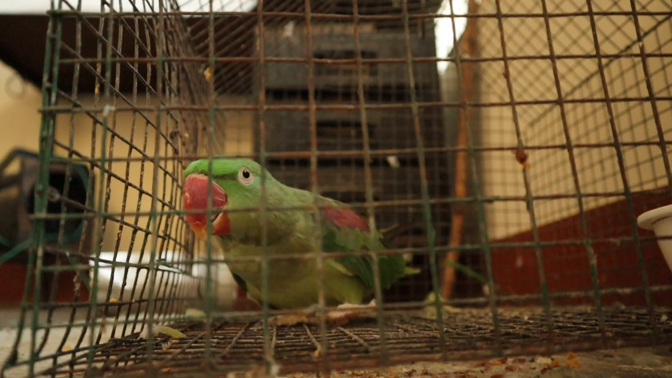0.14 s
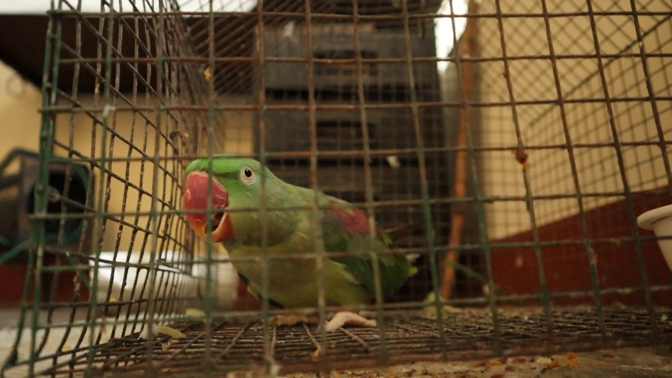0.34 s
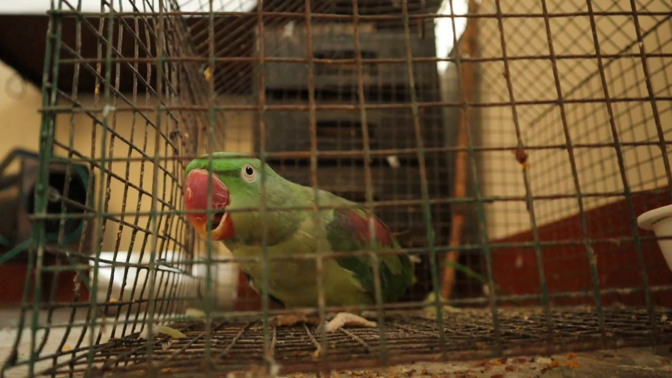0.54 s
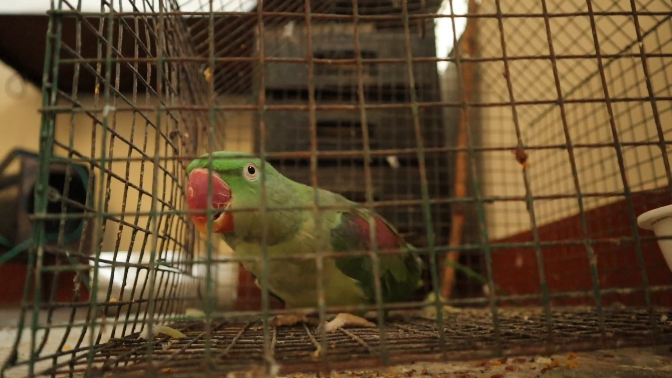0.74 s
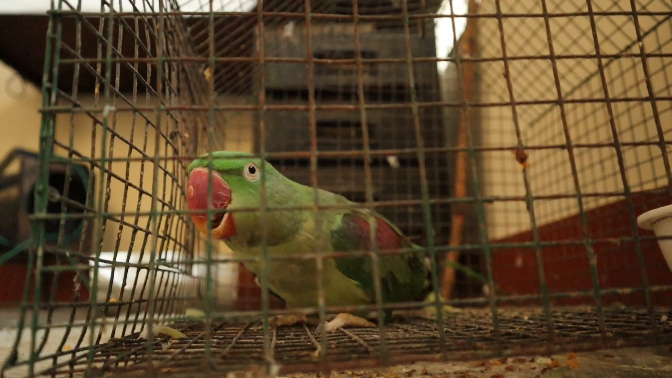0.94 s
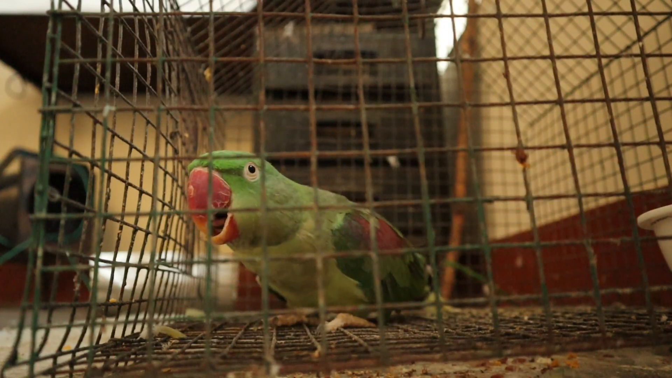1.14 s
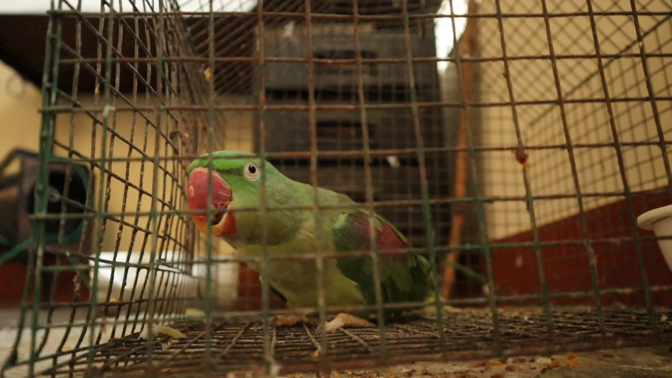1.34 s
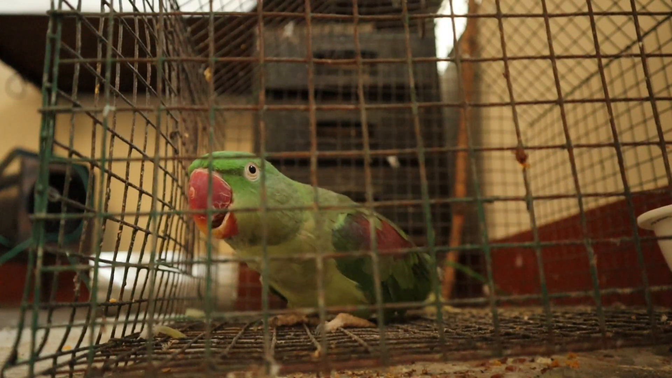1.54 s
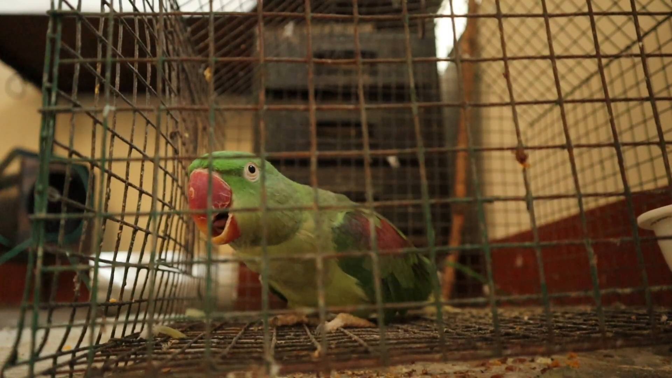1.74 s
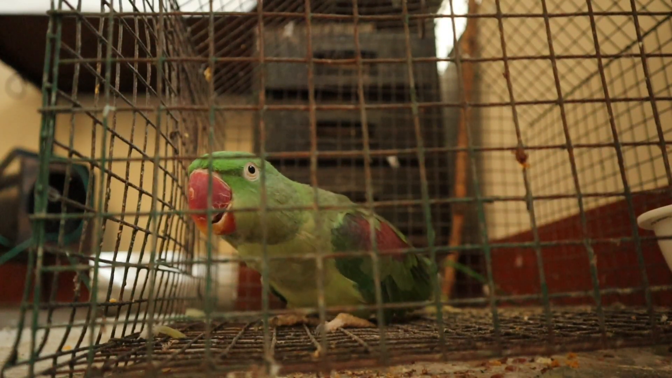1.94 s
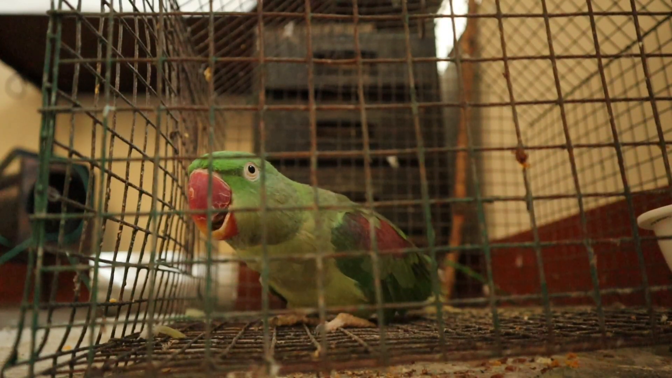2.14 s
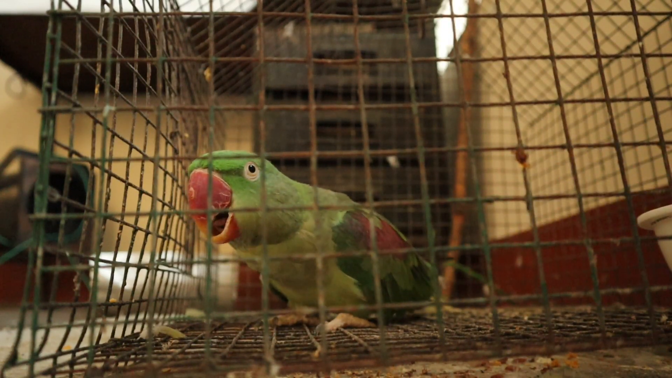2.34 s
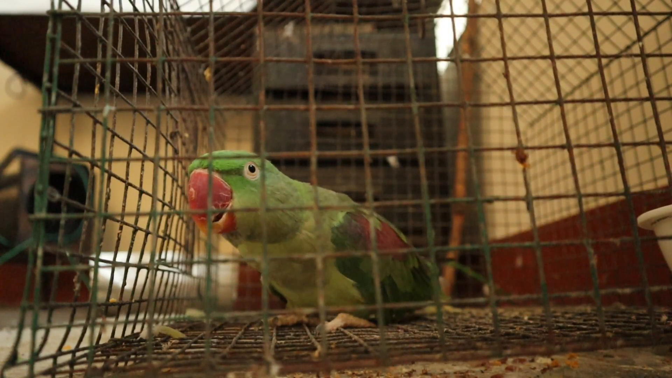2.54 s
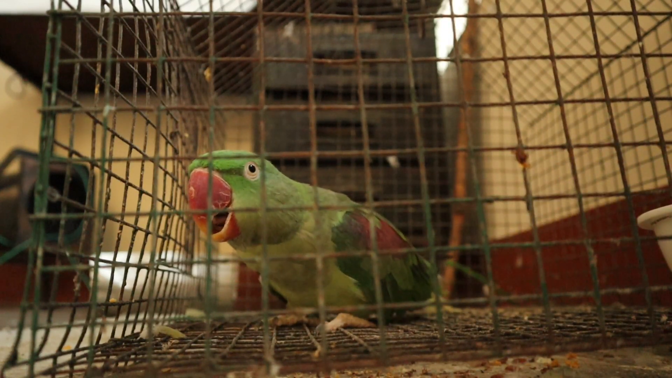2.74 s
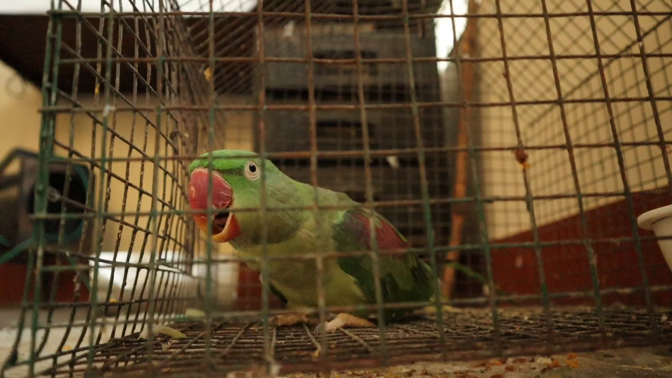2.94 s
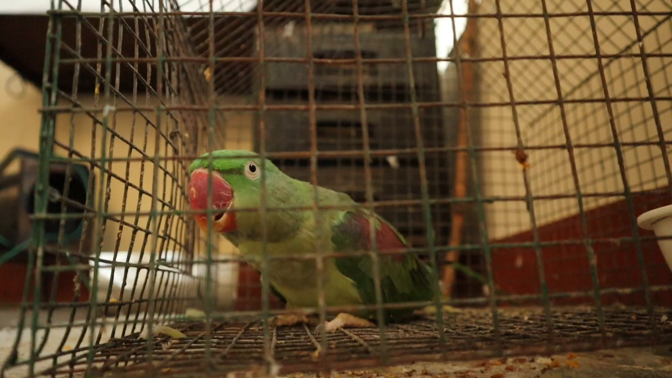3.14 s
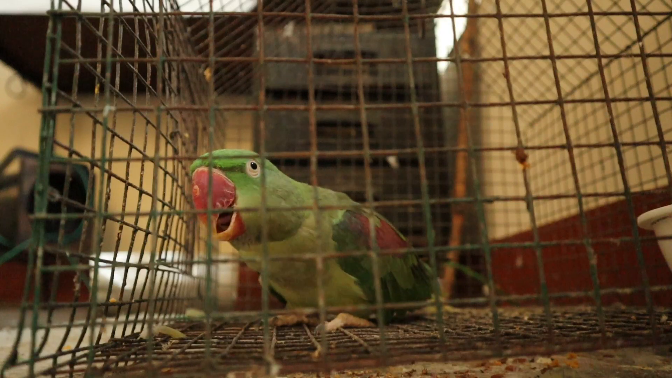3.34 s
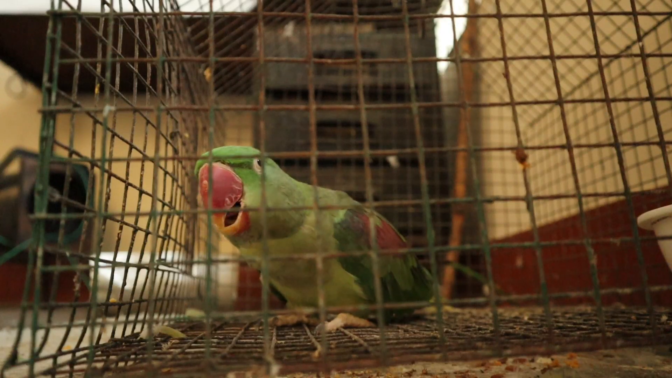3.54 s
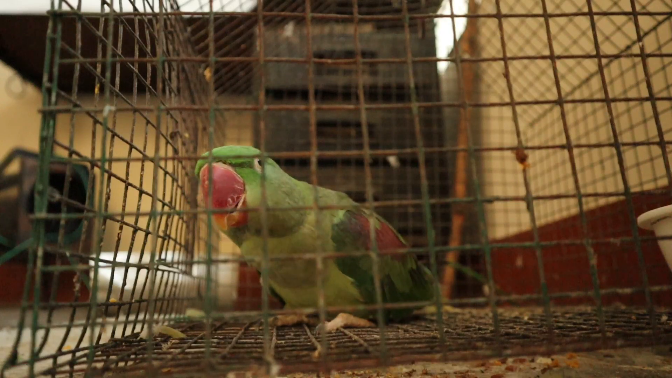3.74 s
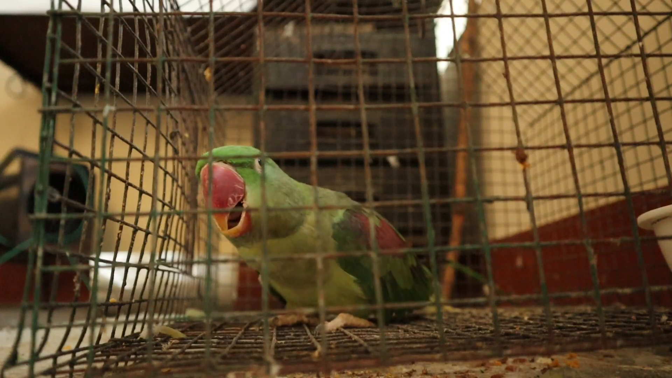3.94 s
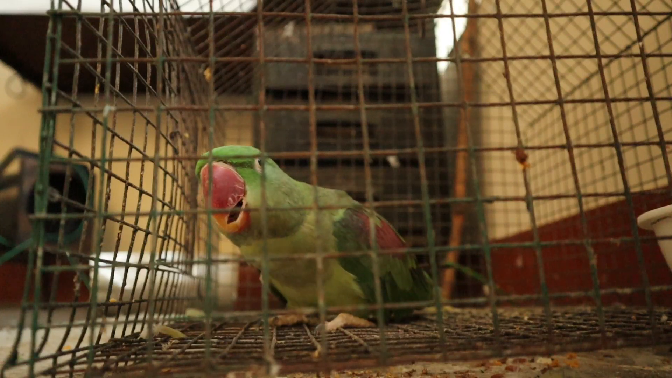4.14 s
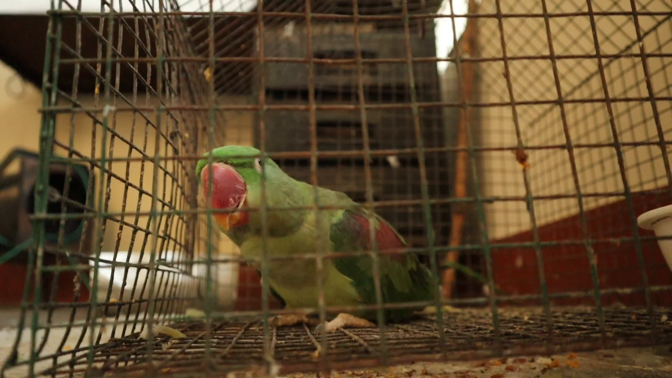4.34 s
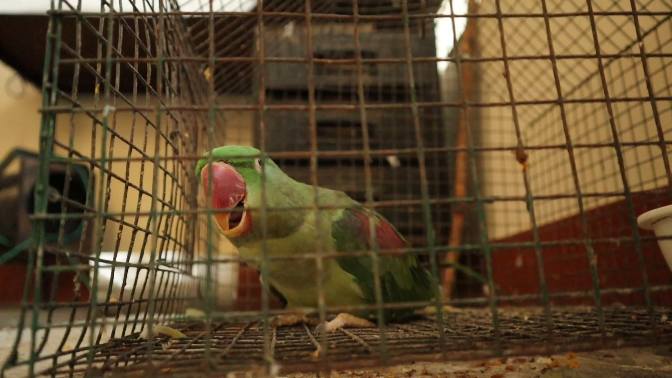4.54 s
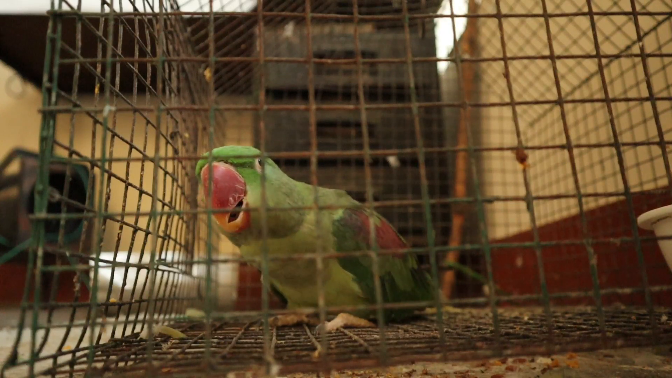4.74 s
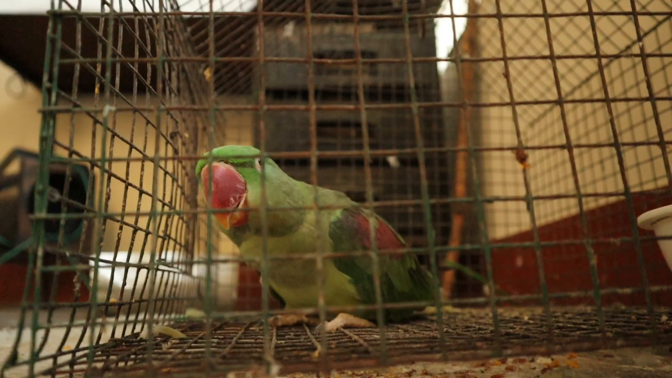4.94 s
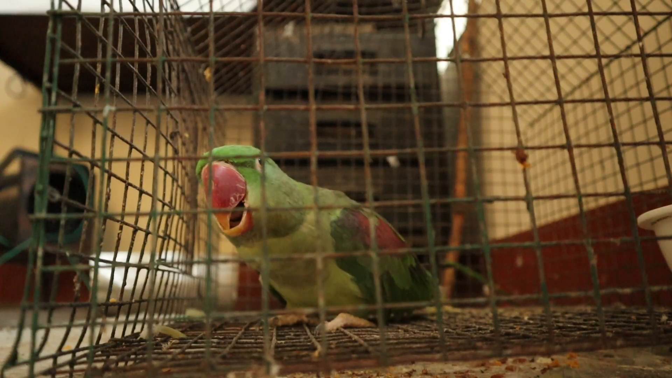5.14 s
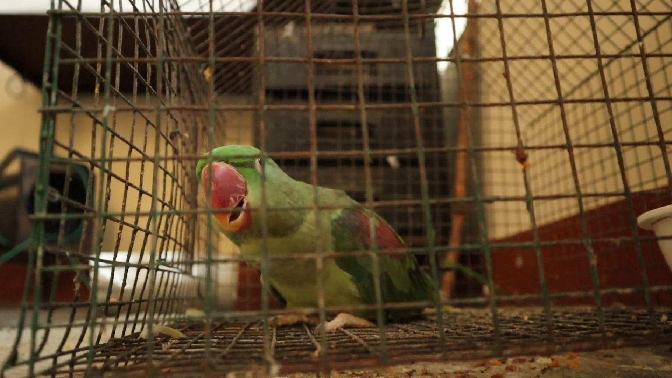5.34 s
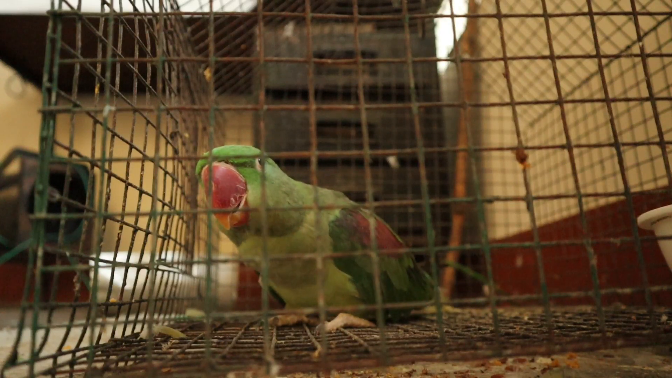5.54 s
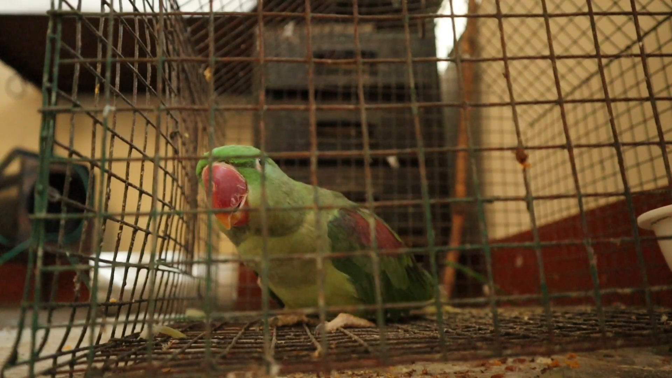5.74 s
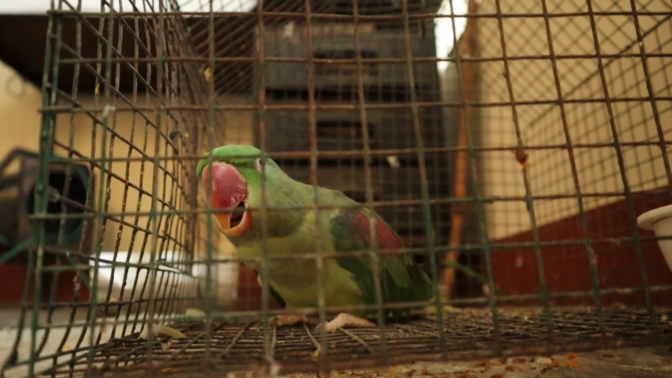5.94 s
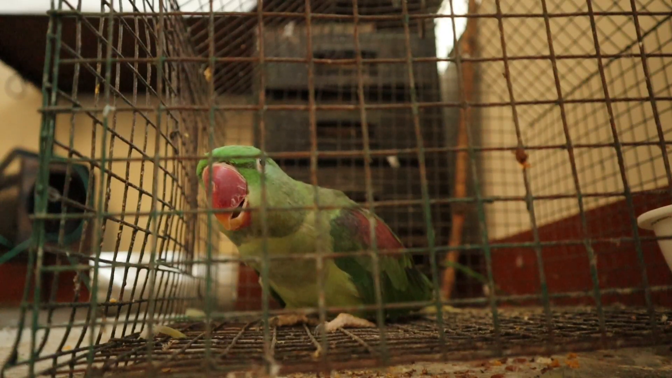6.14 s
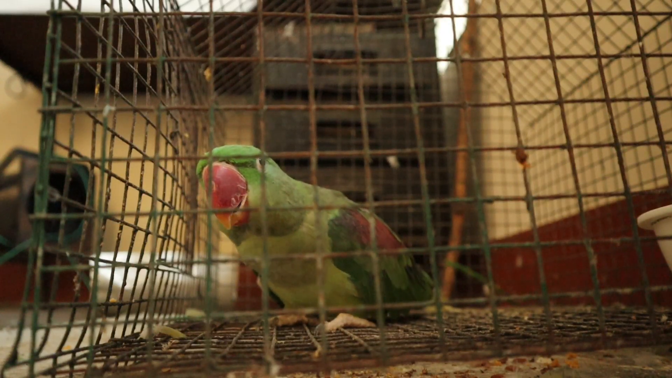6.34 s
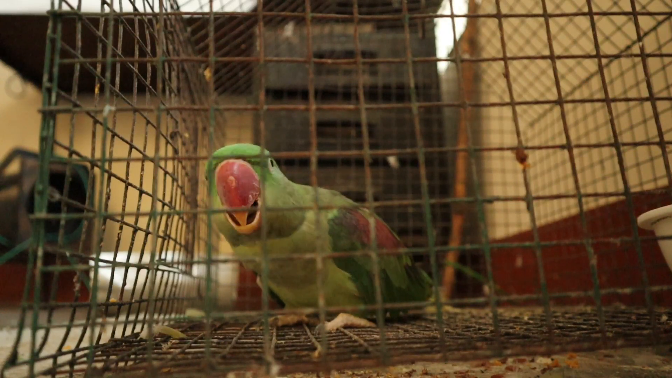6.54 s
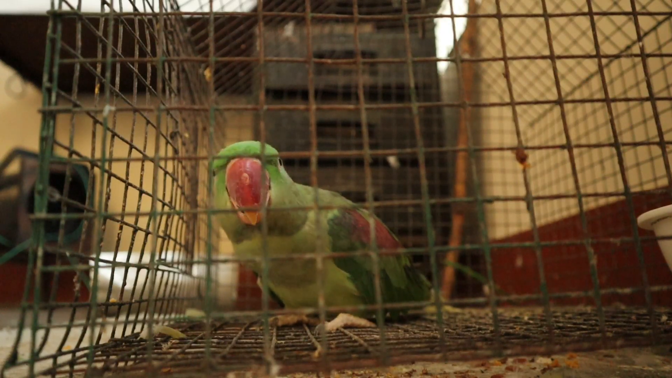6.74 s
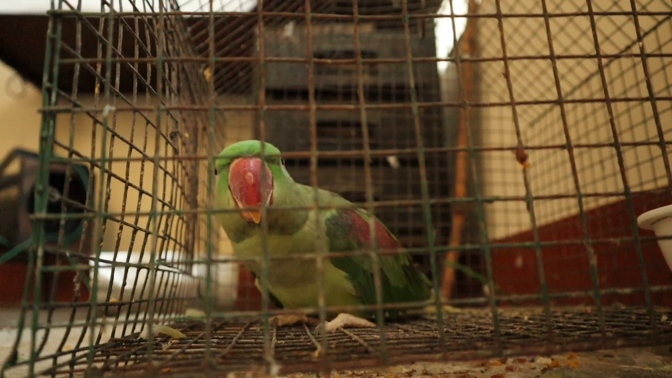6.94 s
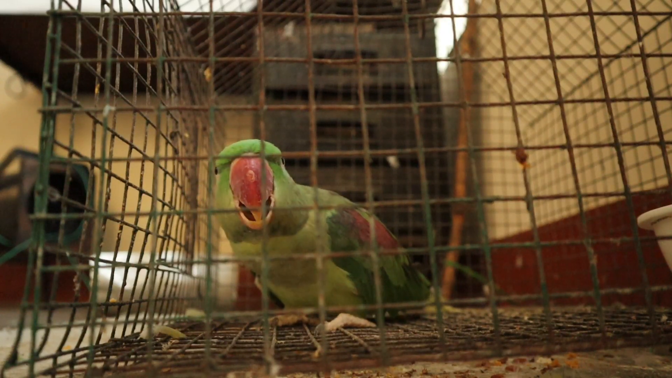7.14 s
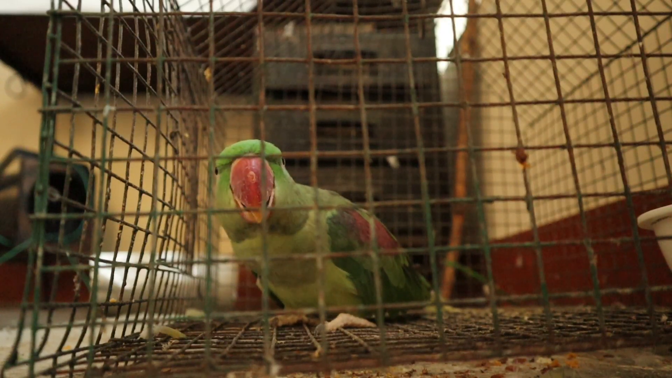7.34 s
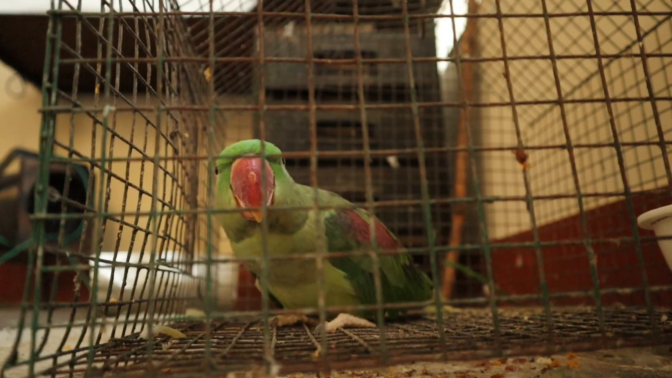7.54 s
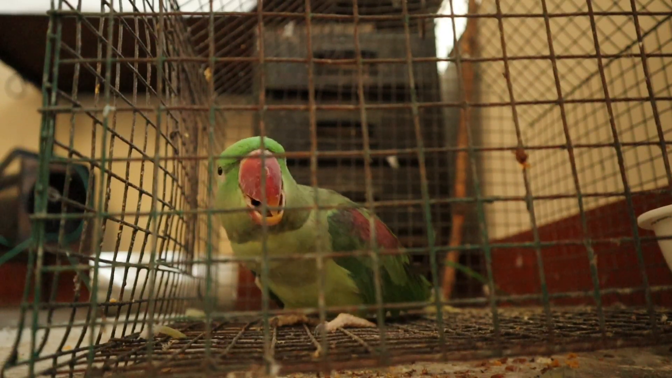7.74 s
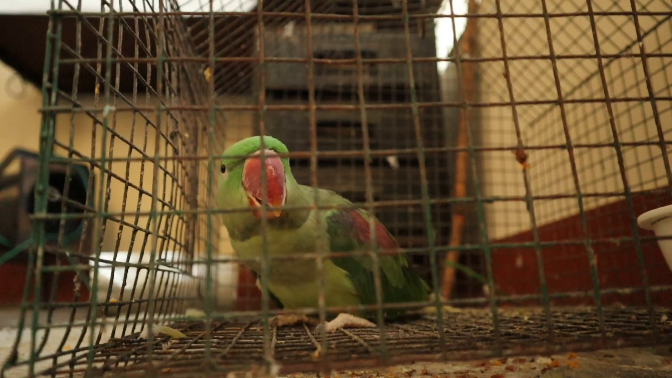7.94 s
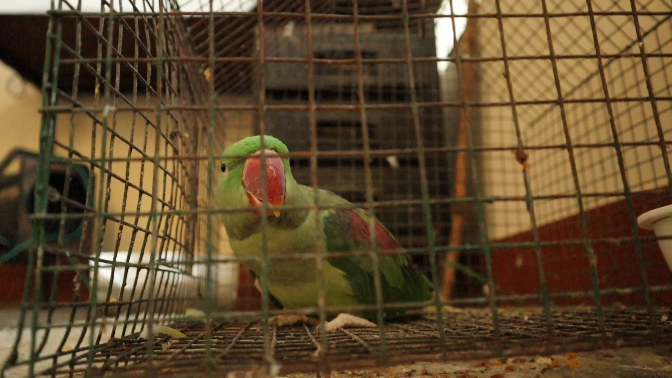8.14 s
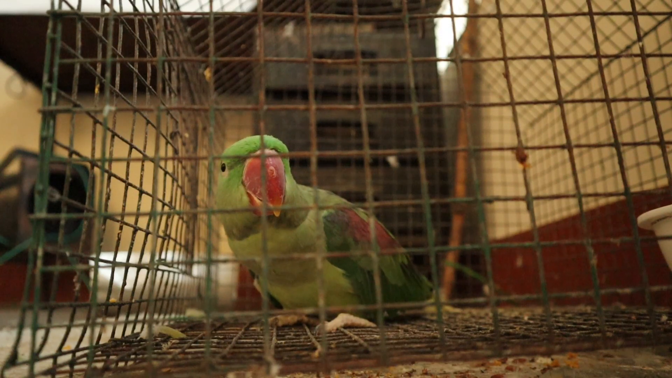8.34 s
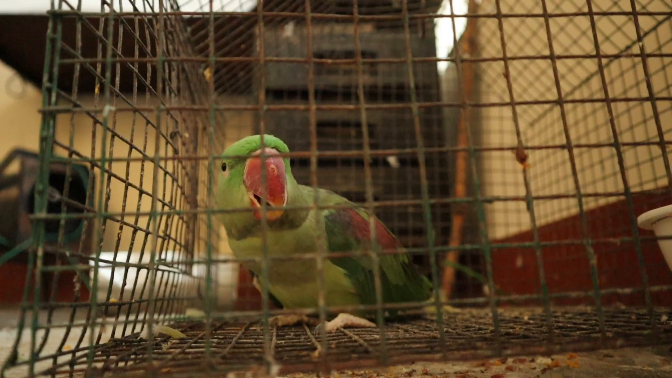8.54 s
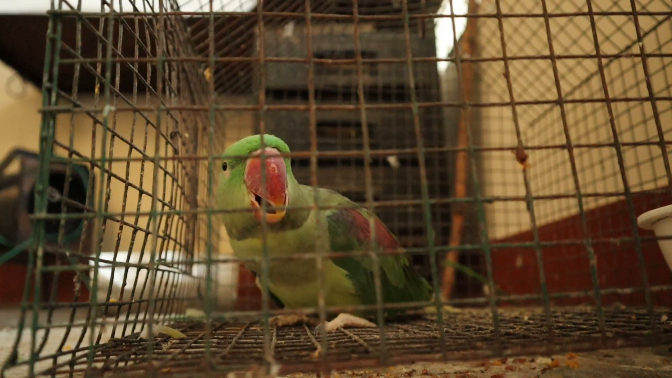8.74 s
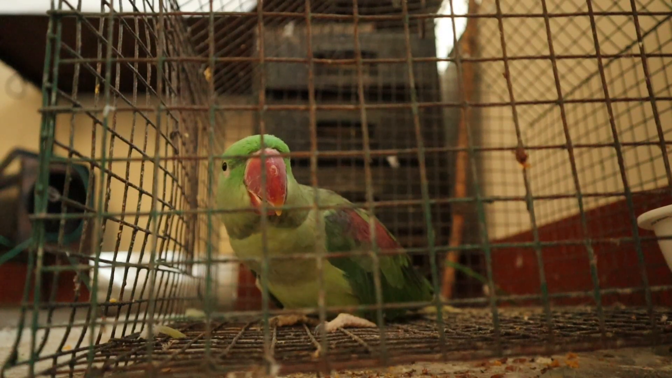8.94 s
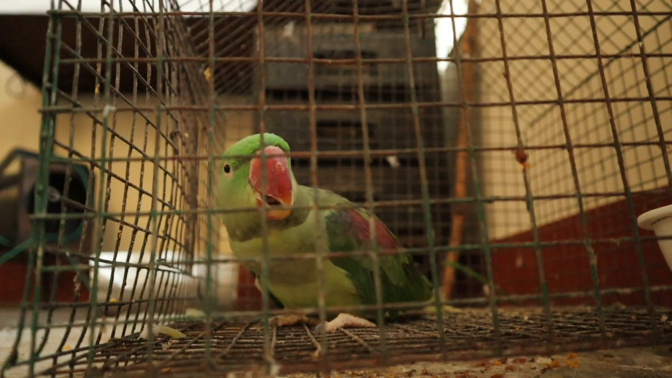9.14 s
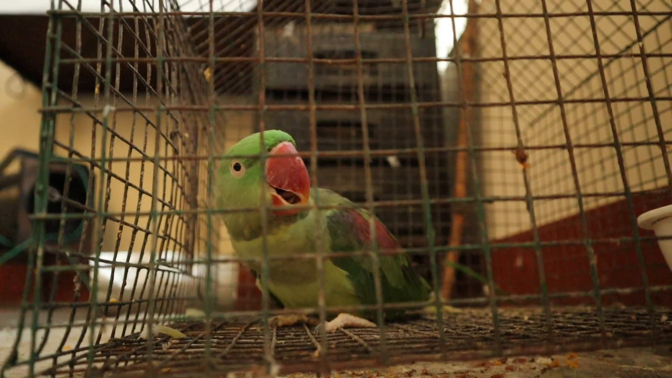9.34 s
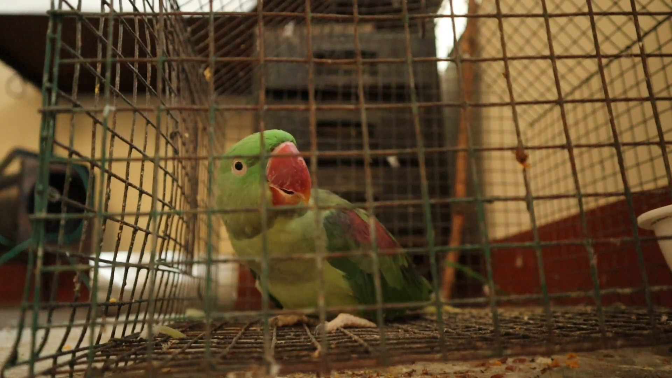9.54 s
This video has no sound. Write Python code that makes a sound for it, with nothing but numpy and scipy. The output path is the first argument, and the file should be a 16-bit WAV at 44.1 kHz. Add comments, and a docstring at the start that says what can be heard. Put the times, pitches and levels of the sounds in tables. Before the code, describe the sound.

A parakeet in a wire cage, close to the microphones on a hard-walled porch. A tiny claw scrape, then two warbling whistles gliding upward, followed by thirteen loud, nasal, slightly rough calls roughly every six tenths of a second. Each sweeps up, dips, arches and drops abruptly, with a short bright ring from the walls. A low distant town murmur fills the gaps, ducked by automatic gain.

```python
"""From the start a distant town murmurs under a caged parakeet on a porch, and a claw scrapes the wire floor.
Next come two warbling whistles: glides topped by quick yelps, the second flicking upward at its end.
Then thirteen loud calls each sweep up, dip, arch and drop, made from harmonics led by the second.
The throat colours every note by fixed resonances, and the walls ring after it through decaying noise.
An automatic gain control starts wide open, ducks under loud notes and is slow to open fully again."""
import sys
import numpy as np
from scipy import signal
from scipy.fft import rfft, irfft, next_fast_len
from scipy.io import wavfile
from scipy.ndimage import uniform_filter1d, minimum_filter1d, map_coordinates

SR = 44100
rng = np.random.default_rng(int(sys.argv[2]) if len(sys.argv) > 2 else 0)


def master_out(mix):
    """Clip the mix to full scale and print it as 16-bit PCM to the path in sys.argv[1]."""
    frames = np.transpose(np.atleast_2d(mix))
    ceiling = np.clip(frames, -1, 1)
    pcm = np.round(ceiling * 32767).astype(np.int16)
    wavfile.write(sys.argv[1], SR, pcm)


N = 426888

# distant town, spectrum shape: (frequency [Hz], relative level [dB per Hz])
TOWN_SPECTRUM = [(15, -31), (25, -3.5), (197, -2.5), (326, -11.5), (1130, -22), (1330, -22.5), (1640, -25),
                 (4250, -32), (11300, -56.5), (14000, -78.5)]
# town murmur before the gain control: (time [s], level [dB])
TOWN_LEVEL = [(0, -71), (1, -70.5), (5, -78), (7.5, -77), (9.7, -71.5)]
# a foot shifts on the wire floor: (time [s], relative level [dB])
SCUFFS = [(0.028, -80), (0.104, -86)]
# faint far-off tones: (start [s], end [s], frequency [Hz], average level before the gain control [dB])
FAR_TONES = [(0.125, 0.809, 199.2, -71), (7.909, 9.719, 157.4, -78), (9.11, 9.247, 444, -64.5)]
# opening whistles: (start [s], length [s], starting pitch [Hz], held from [s], held pitch [Hz],
# swell [s], relative level [dB], brightness [dB per octave], fundamental [dB])
WHISTLES = [(0.359, .414, 611.5, .655, 1297, 0.15, -4.5, -3, -2.5),
            (1.052, 0.3854, 929.4, 1.34, 1357, 0.055, 2.5, -3.5, -6)]
# yelps that make the whistles warble: (crest time [s], crest pitch [Hz], climb [Hz per s],
# sag [Hz per s], accent [dB], roughness [0-1])
YELPS = [(0.415, 1083, 10100, 5180, -4.5, 0), (0.474, 1290, 29900, 8570, 3.5, 0.8),
         (.534, 1326, 38300, 8330, 2.5, 0.8), (.595, 1344, 33660, 6313, 3.5, 0.9),
         (.655, 1345, 26000, 3500, 3.5, 0.4), (1.113, 1442, 13240, 7350, 1, 0.43),
         (1.196, 1546, 13030, 6970, 7, 0.72), (1.439, 1688, 14500, 6700, -3, 0)]
# arched calls: (start [s], length [s], top pitch [Hz], relative level [dB], brightness [dB per octave])
CALLS = [(1.657, 0.36, 1401, 1.5, -2.5), (2.244, 0.34, 1390, 2, -3), (2.814, 0.34, 1380, 1, -2.5),
         (3.386, 0.34, 1373, 0.5, -2.5), (3.958, 0.33, 1372, -1.5, -2), (4.553, 0.34, 1368, -4.5, -2),
         (5.147, 0.34, 1362, -4, -2.5), (5.923, 0.34, 1359, -3.5, -2), (6.527, 0.33, 1356, -4, -1.5),
         (7.13, 0.32, 1345, -3.5, -1), (7.722, 0.33, 1351, -3.5, -1), (8.629, 0.32, 1347, -1.5, -1),
         (9.214, 0.32, 1348, -2.5, -1)]
# strength of the membranes' overtones: (harmonic number, relative level [dB])
MEMBRANE_HARMONICS = [(2, 0), (3, -3.5), (4, -7.5), (5, -8), (6, -11), (8, -14), (10, -21), (14, -36)]
# fixed resonances of throat and beak: (frequency [Hz], gain [dB])
THROAT = [(430, 2.5), (780, -2.5), (1050, -7.5), (1400, -12.5), (1750, 1), (2100, 3.5), (2450, 3),
          (2750, -1), (3150, -6.5), (4200, -4.5), (5000, -5), (5650, -18), (6700, -6.5), (7200, -11.5),
          (9600, -13), (11000, -19), (13000, -23.5), (15500, -38.5)]
# the beak's gape lifts or lowers a band near 4 kHz: (time [s], gain at its centre [dB])
GAPE = [(.4, 2), (1.3, -4.5), (9, -6)]
# echoes off cage floor and bars, one row per microphone, left then right: (delay [ms], gain)
NEAR_ECHOES = [
    [(.755, .38), (1.63, .2)],
    [(1.396, .48), (2.123, .2)],
]
# tone difference of the microphones: (frequency [Hz], left minus right [dB])
LEFT_RIGHT_BALANCE = [(5500, 0), (6500, -4.5), (7500, -4), (10000, -1), (12000, 0)]
# how far the left microphone leads: (frequency [Hz], phase [radians])
LEFT_LEAD = [(400, 0), (2000, .6), (3000, 1.3), (4000, 1.85), (5000, 3.1), (5600, 3.3), (6200, 1.3),
             (7000, 1.3), (9000, 2.2), (12000, 2.5)]
# ring of the walls: (frequency [Hz], time to fall 60 dB [s])
WALL_DECAY = [(300, 0.93), (1300, 0.58), (2700, 0.64), (6500, 0.51), (12000, 0.29)]

TOP_HZ = 15520  # nothing sounds above this
CEILING = 0.96  # highest peak the limiter allows, before the final band limit

# each call opens with one yelp, from a low pitch to a crest just under the top of the arch
SWEEP_FROM_HZ, SWEEP_S, SWEEP_CURVE = 420, 0.095, 0.87
CREST_SHARE, SAG_HZ_PER_S = 0.98, 5200
# partway up, the pitch surges ahead for a moment
SURGE_AT_S, SURGE_S, SURGE_HZ = 0.052, 0.014, 46
# the arch peaks at a share of the call's length; the pitch collapses as the air runs out
ARCH_TOP_SHARE, ARCH_BEND_HZ_PER_S2 = 0.66, 18500
DROP_S, DROP_HZ, DROP_CURVE = 0.029, 636, 1.6
GLIDE_HZ_PER_S = 1500  # steady climb of a whistle under its yelps

# loudness follows pitch, swells in at the start and is released at the end
EFFORT_DB_PER_OCTAVE, ONSET_S, ONSET_DB = 15, 0.025, 4.5
SWELL_DB, CALL_SWELL_S = 11.5, 0.002
CALL_RELEASE_S, WHISTLE_RELEASE_S, RELEASE_DB = 0.067, 0.029, 14
CALL_ACCENT_DB, ACCENT_S = 3, 0.011
# roughness [0-1], strongest just after a crest
CALL_ROUGH, SWEEP_ROUGH = 0.68, 0.5
CALL_HELD_ROUGH, WHISTLE_HELD_ROUGH = 0.27, 0.08
ROUGH_S, ROUGH_LAG_S = 0.083, 0.015


def amp(db):
    """Turn decibels into gain."""
    return 10 ** (np.asarray(db) / 20)


def unit(x):
    """Scale to an rms (average strength) of 1."""
    return x / np.sqrt(np.mean(x ** 2) + 1e-20)


def along(points, hz):
    """Read a curve of (frequency, value) points, with frequency on a log axis."""
    f, value = np.transpose(points)
    return np.interp(np.log(hz + 1), np.log(f + 1), value)


def wobble(rate, size):
    """Draw a smooth random curve with rate random points a second."""
    knots = rng.standard_normal(int(size * rate / SR) + 4)
    return map_coordinates(knots, [np.arange(size) * rate / SR])


def filtered(x, response):
    """Change each frequency's strength and phase by a given response."""
    m = next_fast_len(N + SR // 2)
    hz = np.fft.rfftfreq(m, 1 / SR)
    return irfft(rfft(x, m) * response(hz), m)[..., :N]


def add(track, s, sound):
    """Mix a sound into the track at time s."""
    part = track[max(round(s * SR), 0):][:len(sound)]
    part += sound[:len(part)]


def hiss(size, order=4):
    """Keep only a treble band of random noise."""
    band = signal.butter(order, [3800, 8800], "band", fs=SR, output="sos")
    return unit(signal.sosfilt(band, rng.standard_normal(size)))


def outside(side_db=-14):
    """Distant traffic: noise shaped to a low murmur, nearly the same in both ears."""
    t = np.arange(N) / SR
    noise = rng.standard_normal((2, N))
    mid, side = unit(filtered(noise, lambda hz: amp(along(TOWN_SPECTRUM, hz))))
    level = amp(np.interp(t, *np.transpose(TOWN_LEVEL)))
    return level * (mid + amp(side_db) * np.array([side, -side]))


def scuffs(t60=0.09):
    """Brief dry claw scrapes: treble noise that dies away quickly."""
    track, t = np.zeros(N), np.arange(SR // 4) / SR
    for s, db in SCUFFS:
        add(track, s, amp(db - 60 * t / t60) * hiss(len(t)))
    return track


def far_tones():
    """Far-off steady pitches: sine waves whose strength wavers a little."""
    t = np.arange(N) / SR
    tones = np.zeros(N)
    for start, end, hz, db in FAR_TONES:
        fade = np.clip(np.minimum(t - start, end - t) / 0.012, 0, 1)
        tones += amp(db + 1.5 * wobble(16, N)) * fade * np.sin(2 * np.pi * hz * t)
    return tones


def moments(start, length):
    """List the times, 1 ms apart, at which a note's controls are set."""
    return np.arange(start, start + length, 0.001)


def bump(s, at, width):
    """Draw a bell of height 1 around a moment."""
    return np.exp(-((s - at) / width) ** 2)


def effort(s, pitch, swell_s, release_s):
    """Breath effort in dB: more for high pitch, less at the start and end."""
    onset = np.clip(1 - (s - s[0]) / ONSET_S, 0, 1)
    swell = np.clip(1 - (s - s[0]) / swell_s, 0, 1)
    release = np.clip(1 - (s[-1] - s) / release_s, 0, 1)
    from_pitch = EFFORT_DB_PER_OCTAVE * np.log2(pitch / np.median(pitch))
    return from_pitch - ONSET_DB * onset - SWELL_DB * swell - RELEASE_DB * release


def syrinx(s, pitch, effort_db, rough, bright_db, fundamental_db=-7.5, jitter=0.012, shimmer=0.25,
           edge_db=3, beak_hz=4200, beak_width_hz=700, count=14):
    """The bird's voice box: harmonics of vibrating membranes glide through fixed throat resonances."""
    t = np.arange(s[0], s[-1], 1 / SR)
    pitch = uniform_filter1d(np.interp(t, s, pitch), size=300, mode="nearest")
    effort_db, rough = np.interp(t, s, effort_db), np.interp(t, s, rough)

    # the membranes tremble slowly, and flutter fast when the voice is rough
    tremble = 0.0011 * wobble(70, len(t))
    flutter = jitter * rough * wobble(500, len(t))
    pitch = pitch * (1 + tremble + flutter)
    phase = 2 * np.pi * np.cumsum(pitch) / SR
    k = np.arange(1, count + 1)[:, None]  # harmonic numbers
    harmonic_hz = k * pitch

    # the second harmonic leads; a rough voice has stronger high overtones
    tilt_db = (bright_db + edge_db * rough) * np.log2(k / 2)
    source_db = np.where(k == 1, fundamental_db, along(MEMBRANE_HARMONICS, k) + tilt_db)

    # each overtone above the second flickers in strength on its own
    knots = np.arange(s[0], s[-1], 0.008)
    draws = rng.standard_normal((count, len(knots)))
    flicker = np.array([np.interp(t, knots, row) for row in draws])
    flicker_db = (k > 2) * (1 + 4 * rough) * flicker

    gape_db = np.interp(s[0], *np.transpose(GAPE))
    beak_db = gape_db / (1 + ((harmonic_hz - beak_hz) / beak_width_hz) ** 2)
    gain = amp(source_db + flicker_db + beak_db + along(THROAT, harmonic_hz))
    partials = gain * (harmonic_hz < TOP_HZ) * np.sin(k * phase)
    tone = (1 + shimmer * rough * wobble(560, len(t))) * partials.sum(0)

    # a little air escapes once a cycle and adds treble noise
    air = amp(2 * bright_db - 24) * rough * (1 + np.cos(phase)) * hiss(len(t))
    fade = np.clip(np.minimum(t - s[0], s[-1] - t) / 0.004, 0, 1)
    return fade * amp(effort_db) * (tone + air)


def whistle(start, length, start_hz, held_s, held_hz, swell_s, db, bright_db, fundamental_db):
    """Yelps, with a straight climb and sag in pitch, ride on a glide up to a held pitch."""
    s = moments(start, length)
    own_yelps = [y for y in YELPS if abs(y[0] - s.mean()) < length]
    at, crest_hz, climb, sag, accent_db, yelp_rough = np.transpose(own_yelps)[:, :, None]
    yelps = crest_hz - np.maximum(climb * (at - s), sag * (s - at))
    rising = np.minimum(start_hz + GLIDE_HZ_PER_S * (s - start), held_hz)
    glide = np.where(s < held_s, rising, held_hz)
    # the higher of yelp and glide sounds
    pitch = uniform_filter1d(np.maximum(yelps.max(0), glide), size=9, mode="nearest")
    accents = (accent_db * bump(s, at, ACCENT_S)).sum(0)
    effort_db = db + effort(s, pitch, swell_s, WHISTLE_RELEASE_S) + accents
    after_crests = (yelp_rough * bump(s, at + ROUGH_LAG_S, ROUGH_S)).max(0)
    rough = np.maximum(after_crests, WHISTLE_HELD_ROUGH)
    return syrinx(s, pitch, effort_db, rough, bright_db, fundamental_db)


def call(start, length, top_hz, db, bright_db):
    """One yelp sweeps up and sags into a long curved arch of pitch, which collapses at the end."""
    s = moments(start, length)
    t = s - start
    crest_hz = CREST_SHARE * top_hz
    climb = (crest_hz - SWEEP_FROM_HZ) * (t / SWEEP_S) ** SWEEP_CURVE
    surge = SURGE_HZ * bump(t, SURGE_AT_S, SURGE_S)
    sweep = SWEEP_FROM_HZ + climb + surge
    yelp = np.minimum(sweep, crest_hz - SAG_HZ_PER_S * (t - SWEEP_S))
    arch = top_hz - ARCH_BEND_HZ_PER_S2 * (t - ARCH_TOP_SHARE * length) ** 2
    drop = DROP_HZ * np.maximum(1 - (length - t) / DROP_S, 0) ** DROP_CURVE
    pitch = np.maximum(np.maximum(yelp, arch * (t > SWEEP_S)) - drop, SWEEP_FROM_HZ)
    accent = CALL_ACCENT_DB * bump(t, SWEEP_S, ACCENT_S)
    effort_db = db + effort(s, pitch, CALL_SWELL_S, CALL_RELEASE_S) + accent
    after_crest = CALL_ROUGH * bump(t, SWEEP_S + ROUGH_LAG_S, ROUGH_S)
    base_rough = np.where(t < SWEEP_S, SWEEP_ROUGH, CALL_HELD_ROUGH)
    return syrinx(s, pitch, effort_db, np.maximum(after_crest, base_rough), bright_db)


def parakeet():
    """Two whistles, then one call shape repeated at its own pitch, length and strength."""
    voice = np.zeros(N)
    for row in WHISTLES:
        add(voice, row[0], whistle(*row))
    for row in CALLS:
        add(voice, row[0], call(*row))
    return amp(-16.5) * voice


def direct(voice, echo_top_hz=5000):
    """Sound reaches the left microphone first; delayed copies colour each side differently."""
    side = np.array([[0.5], [-0.5]])  # each side takes half of the left-right difference

    def echoes(hz):
        return np.array([sum(gain * np.exp(-2j * np.pi * hz * ms / 1000) for ms, gain in port)
                         for port in NEAR_ECHOES])

    def response(hz):
        comb = 1 + echoes(hz) / (1 + (hz / echo_top_hz) ** 4)  # the echoes lose their treble
        lead = np.exp(1j * side * along(LEFT_LEAD, hz))
        return comb * lead * amp(side * along(LEFT_RIGHT_BALANCE, hz))

    return filtered(voice, response)


def room(voice, decay, gap_s):
    """Many blurred reflections: a stereo noise tail in which each frequency dies at its own speed."""
    hz, t, z = signal.stft(rng.standard_normal((2, SR)), SR, nperseg=256)
    fading = z * amp(-60 * t / along(decay, hz)[:, None])
    tail = signal.istft(fading, SR, nperseg=256)[1]
    gap = round(abs(gap_s) * SR)
    tail = np.pad(tail / np.linalg.norm(tail[0]), ((0, 0), (gap, 0)))
    return signal.fftconvolve(voice[None], tail, axes=1)[:, :N]


def scene():
    """The town, the bird close by, the near walls' quick scatter and the porch's ring."""
    town = outside()
    bird = scuffs() + parakeet()
    scatter = amp(-14) * room(bird, [(1000, 0.16), (10000, 0.12)], gap_s=0.003)  # (Hz, t60 s)
    ring = amp(-15.5) * room(bird, WALL_DECAY, gap_s=0.0043)
    return direct(bird) + scatter + ring + town + far_tones()


def gain_control(x, open_db=28, target_db=-11.0, hold_s=0.046, release_db=260, forget_db=3,
                 settle_s=2.74, attack_s=0.0078, size=44):
    """A fast stage ducks under loud notes; a slow stage remembers them and keeps the gain down."""
    rate = SR / size  # level readings a second
    power = np.abs(uniform_filter1d(np.mean(x ** 2, 0), size=4 * size))[::size]
    t = np.arange(len(power)) / rate
    excess_db = np.maximum(10 * np.log10(power + 1e-12) + open_db - target_db, 0)

    def recover(db, speed):
        """Rise at once, but fall no faster than speed dB a second."""
        return np.maximum.accumulate(db + speed * t) - speed * t

    def smooth(db, seconds):
        """Follow a changing level with a lag."""
        keep = np.exp(-1 / (seconds * rate))
        return signal.lfilter([1 - keep], [1, -keep], db)

    falling = recover(excess_db, release_db)
    held = np.maximum(falling, np.interp(t - hold_s, t, falling))
    fast = smooth(held, attack_s)
    slow = smooth(recover(excess_db, forget_db), settle_s)
    cut_db = np.interp(np.arange(N) / SR, t, np.maximum(fast, slow))
    return x * amp(open_db - cut_db)


def limiter(x, size=130):
    """Looks ahead and turns down the peaks that slip past the gain control."""
    needed = CEILING / np.maximum(np.abs(x).max(0), CEILING)
    return x * uniform_filter1d(minimum_filter1d(needed, size=size), size=size)


def record(dry):
    """Ride the gain, limit the peaks and remove everything above the top frequency."""
    limited = limiter(gain_control(dry))
    return filtered(limited, lambda hz: hz < TOP_HZ)


dry = scene()
out = record(dry)
master_out(out)
```